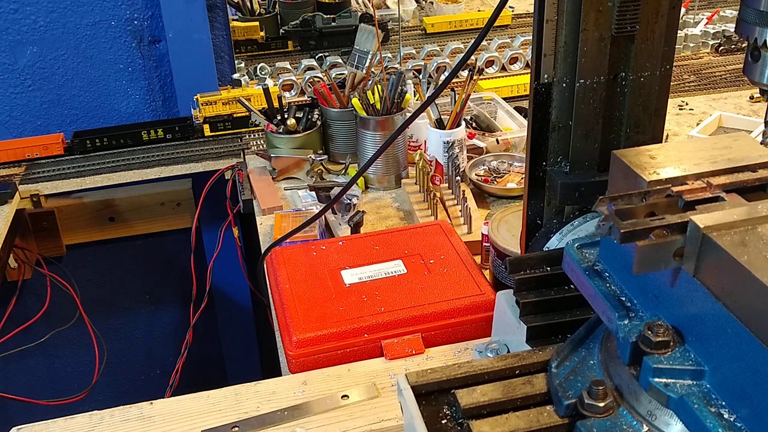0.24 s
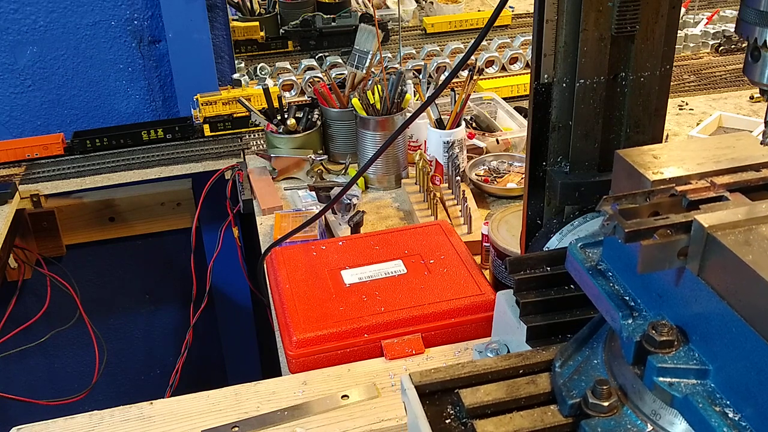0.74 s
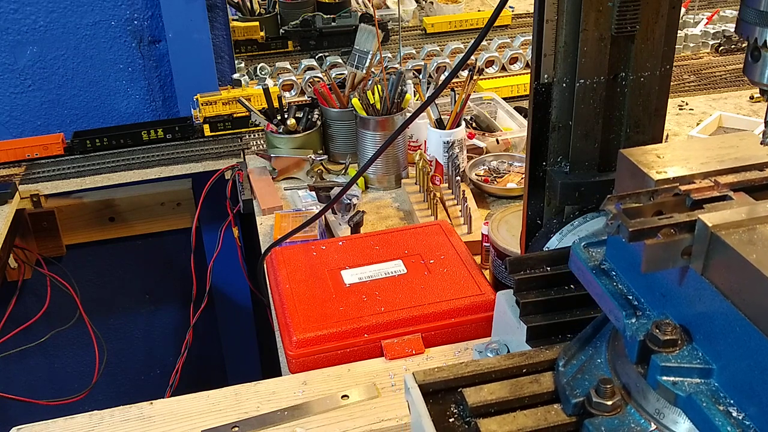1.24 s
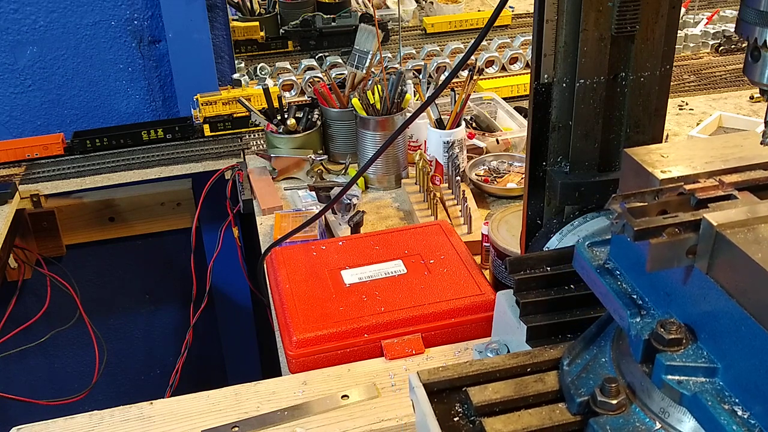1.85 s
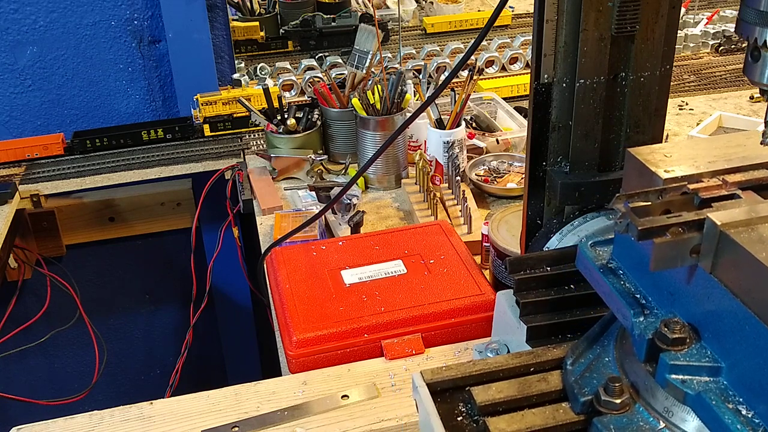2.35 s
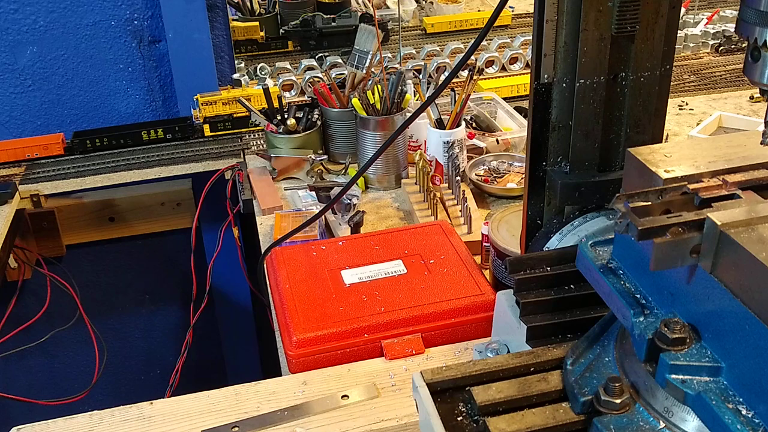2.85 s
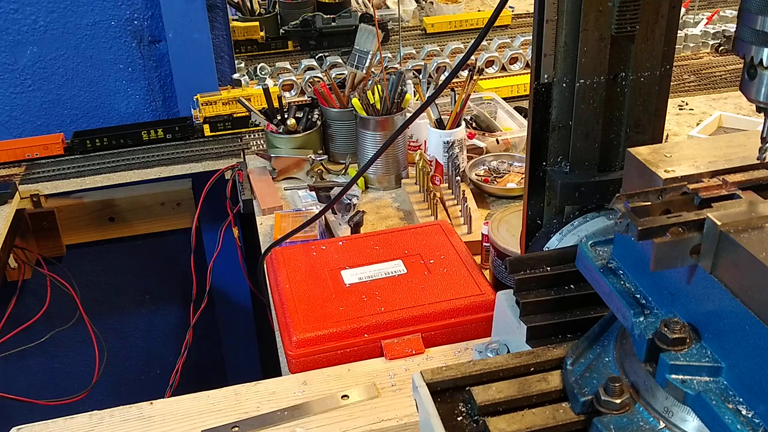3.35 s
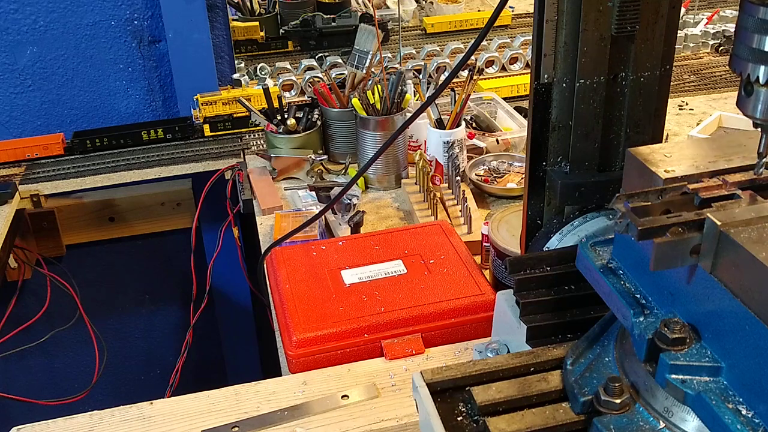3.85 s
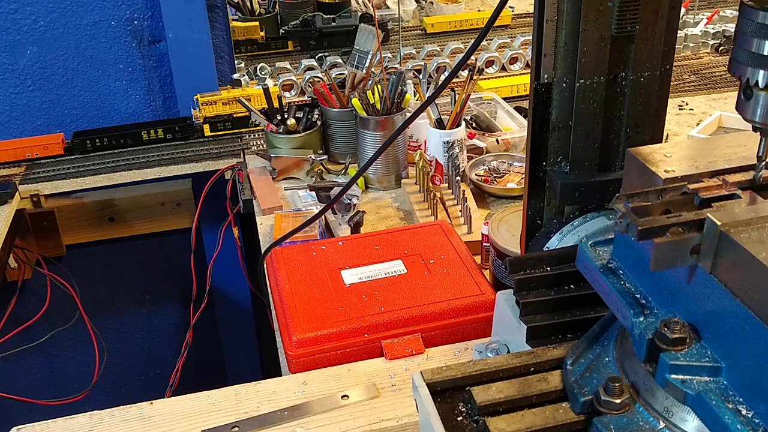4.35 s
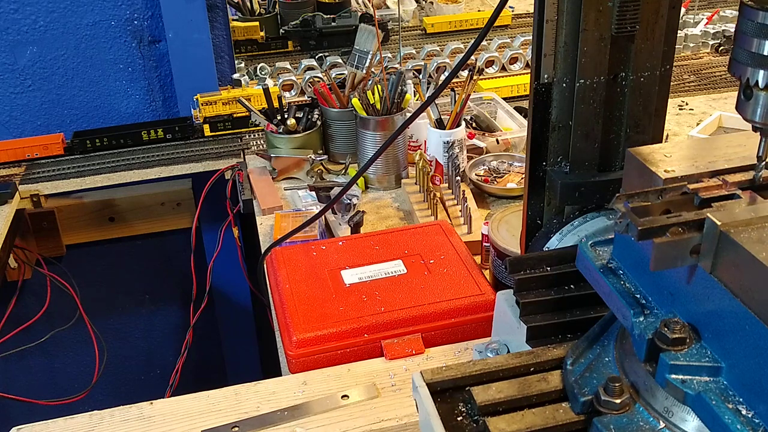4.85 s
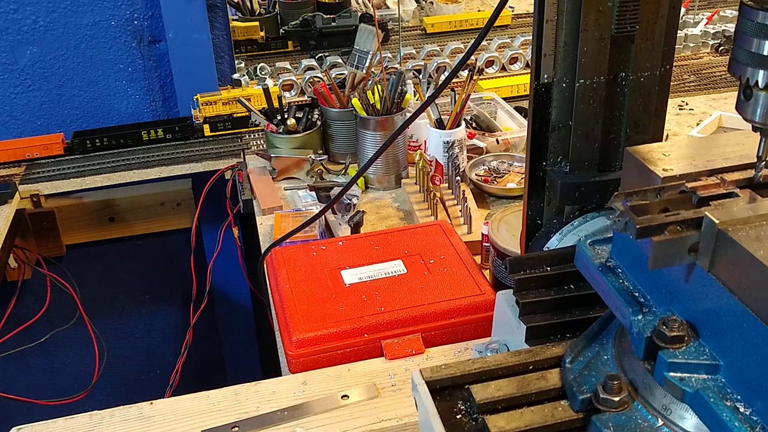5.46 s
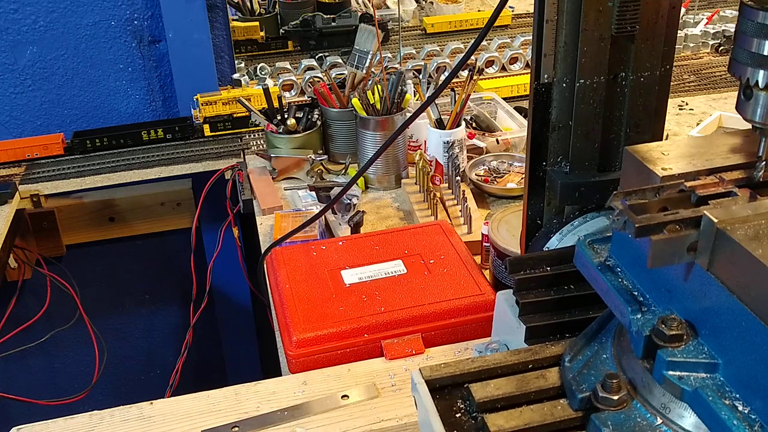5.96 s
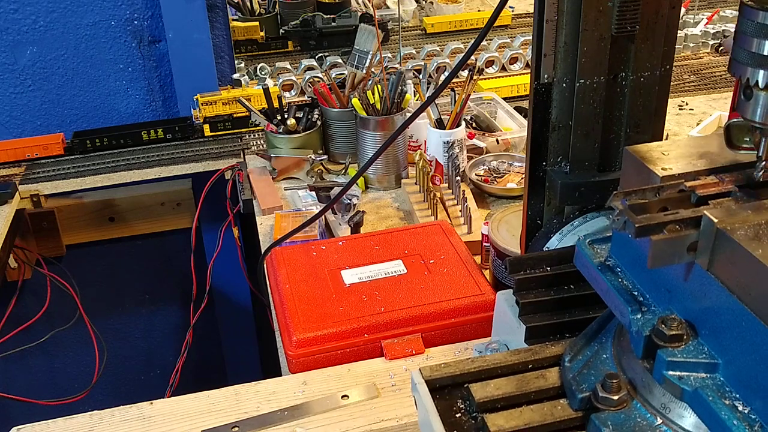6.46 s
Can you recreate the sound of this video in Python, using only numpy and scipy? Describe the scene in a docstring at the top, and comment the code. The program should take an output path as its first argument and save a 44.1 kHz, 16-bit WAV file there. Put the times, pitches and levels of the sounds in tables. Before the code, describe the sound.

Quick rhythmic rasps and falling metal squeaks from a cranked machine feed, followed by a few loose knocks and clicks.

```python
"""A dry bearing rasps, three turns a second, as the feed of a bench milling machine is cranked down.
It binds once a turn: four rasps of slow, uneven slips, the third with a thin whistle, then four falling
squeals of fast stick-slip. Friction makes the frame groan, and the backlash knocks at each release.
Then the feed is eased on with scattered clicks and knocks. A soft rush of air fills the small workshop."""
import sys
import numpy as np
from scipy import signal
from scipy.fft import rfft, irfft
from scipy.io import wavfile
from scipy.ndimage import uniform_filter1d

SR = 44100
rng = np.random.default_rng(int(sys.argv[2]) if len(sys.argv) > 2 else 0)


def generate_wav(sig):
    """Save sig (samples, or channels by samples) to the path in sys.argv[1] as 16-bit PCM at SR."""
    pcm = np.round(np.clip(np.atleast_2d(sig).T, -1, 1) * 32767).astype(np.int16)
    wavfile.write(sys.argv[1], SR, pcm)


N = 295188
TIME = np.arange(N) / SR


def from_db(db):
    """Decibels to gain."""
    return 10 ** (np.asarray(db) / 20)


def unit_rms(x):
    """Scale to unit power overall."""
    return x / np.sqrt(np.mean(x ** 2) + 1e-20)


def levelled(x):
    """Hold unit power over a sliding 16 ms."""
    return x / np.sqrt(np.abs(uniform_filter1d(x ** 2, size=700)) + 1e-12)


def at_hz(points, hz):
    """Read a spectrum on a log-frequency axis."""
    point_hz, point_db = np.transpose(points)
    return np.interp(np.log(hz + 1), np.log(point_hz + 1), point_db)


def coloured(x, spectrum):
    """Minimum-phase filter with the given spectrum, corners rounded."""
    size = 4096
    hz = np.geomspace(10, SR / 2, num=800)
    rounded = np.c_[hz, uniform_filter1d(at_hz(spectrum, hz), size=9)]
    bin_hz = np.arange(size // 2 + 1) * SR / size
    cepstrum = irfft(np.log(from_db(at_hz(rounded, bin_hz))))
    cepstrum[1:size // 2] *= 2
    cepstrum[size // 2 + 1:] = 0
    return signal.fftconvolve(x, irfft(np.exp(rfft(cepstrum))))[:len(x)]


def drift(rate_hz):
    """Smooth random wander, unit RMS."""
    lowpass = signal.butter(2, rate_hz, fs=SR, output="sos")
    return unit_rms(signal.sosfilt(lowpass, rng.standard_normal(N)))


def ring(x, hz, t60_s):
    """One mode: a unit click starts a decaying unit sine."""
    radius, angle = from_db(-60 / (t60_s * SR)), 2 * np.pi * hz / SR
    return signal.lfilter([0, np.sin(angle)], [1, -2 * radius * np.cos(angle), radius ** 2], x + 1e-18)


def struck(x, modes):
    """All modes of a body driven together, in alternating polarity."""
    return sum((-1) ** k * from_db(db) * ring(x, hz, t60_s) for k, (hz, db, t60_s) in enumerate(modes))


def per_turn(turns):
    """Per sample: seconds since the bearing last caught, then that turn's other columns."""
    rows = np.array(turns)
    current = np.maximum(np.searchsorted(rows[:, 0], TIME) - 1, 0)
    start_s, *columns = rows[current].T
    return [np.maximum(TIME - start_s, 0), *columns]


def binding(age_s, length_s, attack_s, release_s):
    """Envelope: swells as the bearing catches, holds while it binds, dies as it lets go."""
    swell = 1 - np.exp(-(age_s / attack_s) ** 1.5)
    return swell * np.exp(-np.maximum(age_s - length_s, 0) / release_s)


def slips(hz):
    """One sharp pulse each time the contact slips."""
    cycles = np.cumsum(hz) / SR
    offset_samples = (cycles % 1 - .5) * SR / hz
    return np.sinc(offset_samples) * np.exp(-(offset_samples / 6) ** 2)


# Rasping turns. Each row: start in seconds, length in seconds, groan in dB, closing knock in dB,
# attack in seconds, body level in dB, easing in dB, edge level in dB, starting resonance in Hz.
RASP_TURNS = [(0.0, 0.15, -48, -28.5, 0.021, -31, 4, -45, 858),
              (.327, .156, -46, -25.5, .010, -30, 6, -43.5, 802),
              (.648, 0.17, -45.5, -27.5, 0.026, -25, 9.5, -32, 787),
              (.971, .177, -48, -34, 0.017, -24, 12.5, -32, 775)]
# Spectra of the housing and of the gritty edge. Each row: frequency in Hz, gain in dB.
RASP_BODY_SPECTRUM = [(310, -53.5), (520, -26.5), (663, -2), (688, -12.5), (751, 5), (814, -11.5),
                      (888, -5), (1120, -7.5), (1430, 3.5), (1720, -16.5), (1860, -3.5), (2040, -9.5),
                      (2300, -5.5), (2990, -92), (5060, -120)]
RASP_EDGE_SPECTRUM = [(1200, -28), (1700, 7.5), (2000, -1), (2400, 0.5), (2900, 3), (3400, -9.5),
                      (4100, -9), (5500, -15.5), (7000, -33.5), (10000, -35.5), (14000, -38)]
# Crank modes, also rung by knocks and squeals. Each row: frequency in Hz, gain in dB, T60 in seconds.
CRANK_MODES = [(740, -7, .04), (900, -2, .06), (1200, -7, .05), (1420, -4, .03), (1680, -5, .025),
               (2980, -9, .02)]


def rasp(slip_hz=142, jitter=.14, wander=.054, grit=.033, rattle_db=3, surge_db=2.5,
         climb_hz_per_s=1400, fade_db_per_s=74, bandwidth_hz=35):
    """Slow, uneven slips ring the housing, the crank and a resonance that climbs as the bearing binds."""
    age_s, length_s, _, _, attack_s, body_db, easing_db, edge_db, catch_hz = per_turn(RASP_TURNS)
    bound_s = np.minimum(age_s, length_s)
    roughness = .32 + .68 * np.exp(-age_s / .03)
    rate_hz = slip_hz * np.exp(jitter * roughness * drift(120) + wander * drift(10))
    pulses = slips(rate_hz) * from_db(rattle_db * drift(130))
    friction = pulses + grit * roughness * rng.standard_normal(N)
    housing = coloured(friction, RASP_BODY_SPECTRUM)
    # Moving resonance: shift down to 0 Hz, low-pass, shift back.
    carrier = np.exp(2j * np.pi * np.cumsum(catch_hz + climb_hz_per_s * bound_s) / SR)
    pole = np.exp(-np.pi * bandwidth_hz / SR)
    gliding = np.real(carrier * signal.lfilter([1], [1, -pole], housing / carrier))
    resonance = from_db(-fade_db_per_s * bound_s) * levelled(gliding)
    crank = from_db(-12) * levelled(struck(housing, CRANK_MODES))
    # The edge eases sooner and further than the body.
    body_db = body_db - easing_db * (1 - np.exp(-(age_s / .058) ** 2))
    edge_db = edge_db - 1.9 * easing_db * (1 - np.exp(-(age_s / .05) ** 2))
    body = from_db(body_db) * (from_db(-2) * levelled(housing) + resonance + crank)
    edge = from_db(edge_db + 6.5) * levelled(coloured(friction, RASP_EDGE_SPECTRUM))
    surge = from_db(surge_db * drift(24.6))
    return binding(age_s, length_s, attack_s, release_s=.012) * surge * (body + edge)


# Spectra of the shaking frame and the rumbling screw. Each row: frequency in Hz, gain in dB.
FRAME_SPECTRUM = [(70, -20.5), (130, -14.5), (190, -15), (270, 4.5), (340, -15.5), (420, -2.5), (510, -4),
                  (640, -14), (1500, -61.5)]
SCREW_SPECTRUM = [(25, -36.5), (50, -23), (80, -16), (130, 4.5), (190, 1), (300, -6.5), (500, -12),
                  (900, -23), (3000, -63.5)]


def groan(turns, moan_db, rumble_db, moan_hz=423, moan_lead_s=.0067, moan_width_s=.023):
    """Friction shakes the frame, which moans just before release; the screw rumbles a little longer."""
    age_s, length_s, level_db, *_ = per_turn(turns)
    shaking = levelled(coloured(rng.standard_normal(N), FRAME_SPECTRUM))
    load = np.exp(-((age_s - length_s + moan_lead_s) / moan_width_s) ** 2)
    frame = (1 + load / 2) * binding(age_s, length_s, attack_s=.01, release_s=.0095) * shaking
    moan = from_db(moan_db) * load * levelled(ring(shaking, moan_hz, t60_s=.041))
    screw = unit_rms(coloured(rng.standard_normal(N), SCREW_SPECTRUM))
    rumble = from_db(rumble_db) * binding(age_s, length_s, attack_s=.01, release_s=.07) * screw
    return from_db(level_db) * (frame + moan + rumble)


def stereo(mid, side, lean):
    """Left and right from a common and an opposed part, panned by frequency."""
    return np.array([coloured(mid + sign * side, [(hz, sign * db / 2) for hz, db in lean])
                     for sign in (1, -1)])


# Room air. Each row: frequency in Hz, then in dB gain (spectrum), side minus mid (width)
# or left minus right (lean).
AIR_SPECTRUM = [(15, -73.5), (25, -45), (43, -23.5), (64, -22), (113, -3), (188, -3), (267, -2),
                (322, -12.5), (359, -4.5), (389, -8.5), (997, -12.5), (2060, -33), (3340, -29.5),
                (4380, -42), (15500, -51)]
AIR_WIDTH = [(60, -0.5), (92, -3.5), (140, 0), (210, -13), (330, -5), (500, -2.5), (770, -14), (1170, -14),
             (1790, 12), (2740, -0.5), (4190, 0.5), (6410, 1.5), (9810, 1.5), (15000, 4.5)]
AIR_LEAN = [(60, 15), (110, 5.3), (200, 11), (380, 1.5), (700, 1.7), (1290, 0.5), (2380, 0.86), (4400, 1.7),
            (8120, 1.2), (15000, 0.5)]


def air(level_db=-58, side_db=-1):
    """The steady, low rush of air in the room."""
    mid, side = (unit_rms(coloured(noise, AIR_SPECTRUM)) for noise in rng.standard_normal((2, N)))
    return from_db(level_db) * stereo(mid, from_db(side_db) * coloured(side, AIR_WIDTH), AIR_LEAN)


# Loose knocks and clicks of the feed. Each row: start in seconds, ring in dB, thud in dB,
# brightness in dB, first rebound relative to the knock in dB.
FEED_KNOCKS = [(.209, -54, -41, 17.5, -1), (.342, -19, -51, 1, -25), (0.9841, -31.5, -48, 17.5, -12),
               (1.5236, -57, -37, 23.5, -28), (1.92, -69, -41, -15, -19), (2.261, -58, -51, 12, -25),
               (2.2907, -17.5, -56, -13, -17), (2.563, -71, -64, 27, 6), (3.193, -42.5, -31.5, 17, -4.5),
               (3.684, -36.5, -17, 2.5, -29), (3.695, -32.5, -23, 2, -9), (4.332, -48, -45, -3, -14),
               (4.371, -46, -34.5, 4.5, -9), (5.056, -47, -51, -5, -4), (5.103, -62.5, -46.5, -2, -23),
               (5.447, -47, -77, -2, -23.5), (5.599, -41.5, -52, -23.5, -14), (5.633, -31, -34, 4.5, -15),
               (5.789, -52, -75, 2, -16.5), (6.196, -61.5, -67, 16.5, -21), (6.383, -38.5, -41.5, 9, -28),
               (6.5466, -57.5, -74.5, 7, -20.5)]


def contacts(release_thud_db=-42, rebounds=2, rebound_s=.02, loss_db=5.5):
    """Backlash hits: one as each turn lets go, then the loose knocks with their rebounds."""
    for turns, bright_db in ((RASP_TURNS, 10.5), (SQUEAL_TURNS, -13)):
        for start_s, length_s, _, knock_db, *_ in turns:
            yield start_s + length_s, knock_db, release_thud_db, bright_db
    for start_s, ring_db, thud_db, bright_db, rebound_db in FEED_KNOCKS:
        yield start_s, ring_db, thud_db, bright_db
        for k in range(rebounds):
            gain_db = rebound_db - loss_db * k
            yield start_s + rebound_s * (k + 1), ring_db + gain_db, thud_db + gain_db, bright_db - loss_db


# Frame modes. Each row: frequency in Hz, gain in dB, T60 in seconds.
FRAME_MODES = [(115, -16, .08), (190, -12, .06), (255, -4, .06), (340, -5, .05), (420, -2, .05),
               (520, -6, .04), (650, -12, .04), (910, -15, .06)]
# Spectrum of the contact crack. Each row: frequency in Hz, gain in dB.
CRACK_SPECTRUM = [(300, -0.5), (750, -8), (1500, 6), (2100, 7), (3000, -1.5), (4100, 0), (5500, -8.5),
                  (8000, -23), (14000, -27.5)]


def knocks(chatter_s=.0025, crank_db=-6, frame_db=-4, crack_db=13):
    """Each contact chatters briefly, rings the crank, thuds in the frame and gives a dry crack."""
    crank, frame, crack = np.zeros((3, N))
    t = TIME[:SR // 40]
    for start_s, ring_db, thud_db, bright_db in contacts():
        first = round(start_s * SR)
        span = slice(first, first + len(t))
        chatter = rng.standard_normal(len(t)) * np.sqrt(t) * np.exp(-t / chatter_s)
        phase = np.angle(rfft(chatter, 2 * len(t)))
        force = irfft(np.exp(1j * phase))[:len(t)]   # flat spectrum
        crank[span] += from_db(ring_db) * force
        frame[span] += from_db(thud_db) * force
        crack[span] += from_db(ring_db + bright_db) * force
    return (from_db(crank_db) * struck(crank, CRANK_MODES)
            + from_db(frame_db) * struck(frame, FRAME_MODES)
            + from_db(crack_db) * coloured(crack, CRACK_SPECTRUM))


def whistle(start_s=.725, length_s=.054, top_hz=4330, end_hz=3240, level_db=-31.5,
            waver=.023, flutter_db=5):
    """A thin, unsteady falling chirp of metal on metal."""
    age_s = np.maximum(TIME - start_s, 0)
    hz = np.interp(age_s, [0, length_s], [top_hz, end_hz]) * (1 + waver * drift(600))
    phase = 2 * np.pi * np.cumsum(hz) / SR
    tone = sum(from_db(db) * np.sin(k * phase) for k, db in enumerate((0, -28, -34, -34), start=1))
    gain = from_db(level_db + flutter_db * drift(300))
    return binding(age_s, length_s, attack_s=.004, release_s=.002) * gain * unit_rms(tone)


# Squealing turns. Each row: start in seconds, length in seconds, groan in dB, closing knock in dB,
# attack in seconds, peak level in dB, fade in dB, brightness in dB, pitch before and after the glide
# in Hz, glide in seconds, sag in seconds, extra roughness on catching and base roughness from 0 to 1.
SQUEAL_TURNS = [(1.299, .16, -50.5, -30.5, 0.0077, -24, 11, -4, 644.2, 745.7, 0.06, 0.034, 0.95, 0.03),
                (1.615, 0.18, -50, -45, 0.0099, -23, 11.5, -3.5, 666.3, 753.9, .049, .046, 1, 0),
                (1.944, 0.15, -51, -34.5, .009, -23, 11, -4, 681, 765, .051, .036, .8, .17),
                (2.275, 0.14, -48, -24, .032, -22, 21, -5, 954, 708.8, .032, .058, .05, 0.4)]
# Spectra of the squeal's body and upper overtones. Each row: frequency in Hz, gain in dB.
SQUEAL_BODY_SPECTRUM = [(300, -28.5), (520, -8), (710, 0.5), (950, -6.5), (1200, -3), (1450, 5), (1650, -4),
                        (1870, 8), (2200, -9.5), (2600, -45), (4000, -55)]
SQUEAL_EDGE_SPECTRUM = [(1500, -21.5), (2300, 1.5), (2550, 11), (2900, 1.5), (3400, -6), (4200, -7),
                        (5000, -9), (5850, -15), (7000, -29), (8200, -27), (10000, -34), (13500, -37),
                        (15500, -56)]
# Modes of the dry sleeve. Each row: frequency in Hz, gain in dB, T60 in seconds.
SLEEVE_MODES = [(5250, -4.5, .03), (5880, -1, 0.077), (7900, -7, .02), (8370, -7, 0.018),
                (10770, -11.5, .02), (13300, -9, .025), (14100, -10, .02)]


def squeal(slowest_hz=557.7, brightest_hz=700, dulling_db_per_octave=11.5, catch_s=.031,
           peak_share=.51, swell_db=4, jitter=.06, wander=.003, shimmer_db=7, grit=.14, hiss=.016):
    """Fast stick-slip: ragged as it catches, cleaner at full speed, ragged again as it slows."""
    (age_s, length_s, _, _, attack_s, peak_db, fade_db, bright_db,
     catch_hz, full_hz, glide_s, sag_s, catch_roughness, base_roughness) = per_turn(SQUEAL_TURNS)
    progress = np.minimum(age_s / length_s, 1)
    glide_hz = catch_hz + (full_hz - catch_hz) * age_s / glide_s
    sag = np.exp(-(np.maximum(age_s - glide_s, 0) / sag_s) ** 1.2)
    hz = np.where(age_s < glide_s, glide_hz, slowest_hz + (full_hz - slowest_hz) * sag)
    catching = catch_roughness * np.exp(-(age_s / catch_s) ** 2)
    stalling = progress ** 4.4
    roughness = np.clip(base_roughness + catching + stalling, 0, 1)
    rate_hz = hz * np.exp(jitter * roughness * drift(250) + wander * drift(60))
    pulses = slips(rate_hz) * from_db(shimmer_db * roughness * drift(350))
    friction = pulses + grit * roughness * rng.standard_normal(N)
    sliding = friction + hiss * rng.standard_normal(N)
    dulling_db = dulling_db_per_octave * np.abs(np.log2(hz / brightest_hz))
    dulling_db += 2.5 * (roughness - base_roughness)
    body = from_db(1.73) * levelled(coloured(friction, SQUEAL_BODY_SPECTRUM))
    edge = from_db(bright_db + 3 - dulling_db) * levelled(coloured(sliding, SQUEAL_EDGE_SPECTRUM))
    sleeve = from_db(bright_db - 13.5 - 27.5 * progress) * levelled(struck(sliding, SLEEVE_MODES))
    crank = from_db(-10) * np.sqrt(roughness) * levelled(struck(friction, CRANK_MODES))
    level_db = peak_db - swell_db * np.interp(progress, [0, peak_share], [1, 0])
    level_db -= fade_db * np.interp(progress, [peak_share, 1], [0, 1])
    envelope = binding(age_s, length_s, attack_s, release_s=.01) * from_db(level_db)
    return envelope * (body + edge + sleeve + crank)


def echoes(direct, bench_t60_s, room_t60_s, room_db):
    """Impulse response: direct sound, quick scatter off the bench, then the room; broadly flat."""
    t = TIME[:SR // 2]
    decay = from_db(-60 * t / bench_t60_s) + from_db(room_db - 60 * t / room_t60_s)
    response = unit_rms(rng.standard_normal(len(t)) * decay) / np.sqrt(len(t))
    response[0] += direct
    spectrum = rfft(response, 2 * len(t))
    broad_power = uniform_filter1d(np.abs(spectrum) ** 2, size=130)
    return irfft(spectrum / np.sqrt(broad_power))[:len(t)]


# Stereo image of the machine. Each row: frequency in Hz, then in dB side minus mid (width)
# or left minus right (lean).
MACHINE_WIDTH = [(100, -6), (250, -3.5), (500, -8), (700, -12.5), (1000, -23), (1400, -13.5), (1750, -6.5),
                 (2200, 25.5), (2650, -0.5), (3300, -21), (4300, 13), (5500, -6), (6900, 0.5), (10000, -2)]
MACHINE_LEAN = [(60, -2.5), (140, 6.5), (300, -4.5), (420, -5), (520, 0.5), (700, -3), (1000, 0.5),
                (1500, 0.5), (1850, 3), (2150, 3.5), (2600, -7), (3100, -0.5), (8000, 1.5), (15000, 3)]


def workshop(x, direct, side_db=1.5, low_cut_hz=66, **decay):
    """The machine in the room: left and right by turns in step and opposed as frequency rises."""
    hz = np.geomspace(20, SR / 2, num=200)
    width_db = at_hz(MACHINE_WIDTH, hz)
    mid_db = -10 * np.log10(.5 + 10 ** (width_db / 10))   # mid and side share the power
    mid = coloured(echoes(direct, **decay), np.c_[hz, mid_db])
    side = coloured(echoes(0, **decay), np.c_[hz, mid_db + width_db + side_db])
    x = signal.sosfilt(signal.butter(3, low_cut_hz, "high", fs=SR, output="sos"), x)
    return signal.fftconvolve(x[None], stereo(mid, side, MACHINE_LEAN), axes=1)[:, :N]


def scene():
    """Bearing and backlash sound through the workshop, over the air."""
    frame = groan(RASP_TURNS, moan_db=9.5, rumble_db=-1) + groan(SQUEAL_TURNS, moan_db=6, rumble_db=0)
    friction = rasp() + squeal() + whistle() + frame
    bearing = workshop(friction, direct=.9, bench_t60_s=.027, room_t60_s=.22, room_db=-11)
    backlash = workshop(knocks(), direct=1, bench_t60_s=.055, room_t60_s=.081, room_db=-3.5)
    return bearing + backlash + air()


def record(dry):
    """Steep low-pass at 15.7 kHz."""
    return signal.sosfilt(signal.ellip(10, .2, 80, 15700, fs=SR, output="sos"), dry)


dry = scene()
out = record(dry)
generate_wav(out)
```